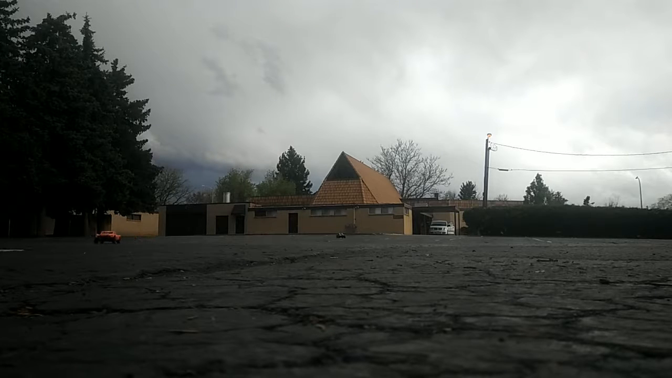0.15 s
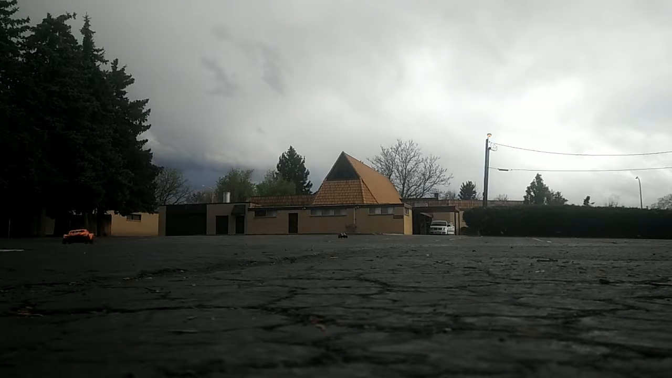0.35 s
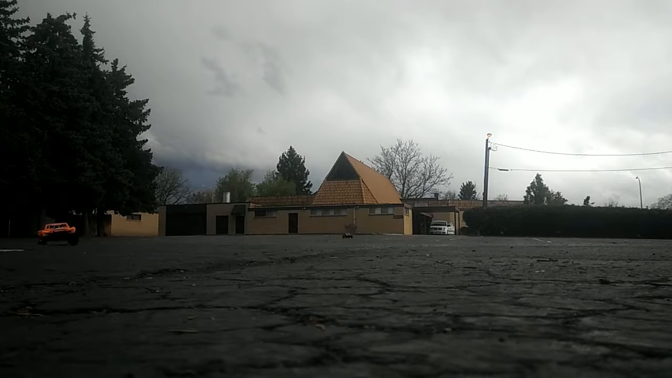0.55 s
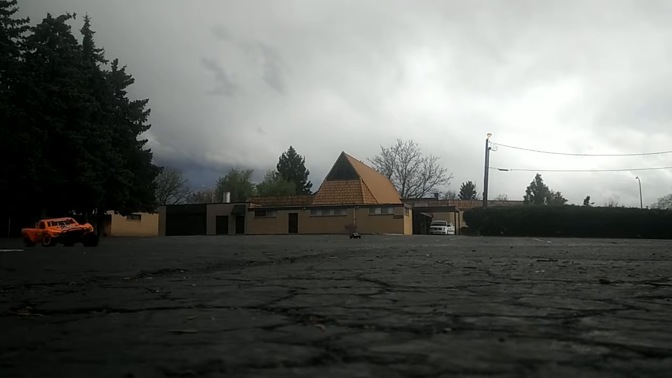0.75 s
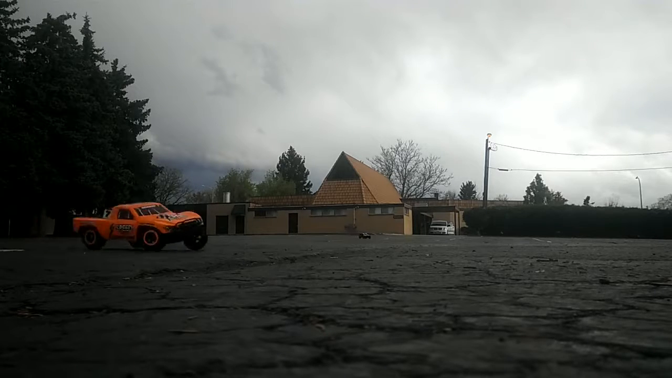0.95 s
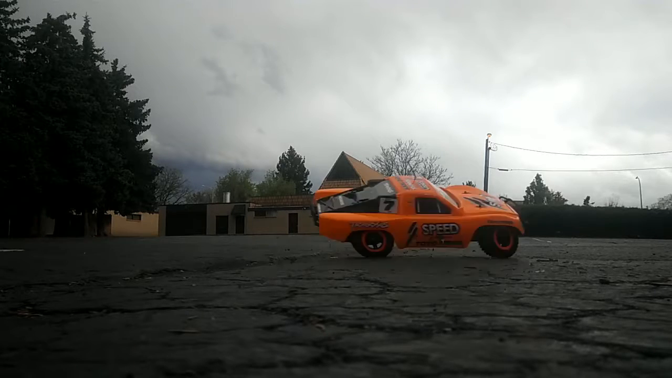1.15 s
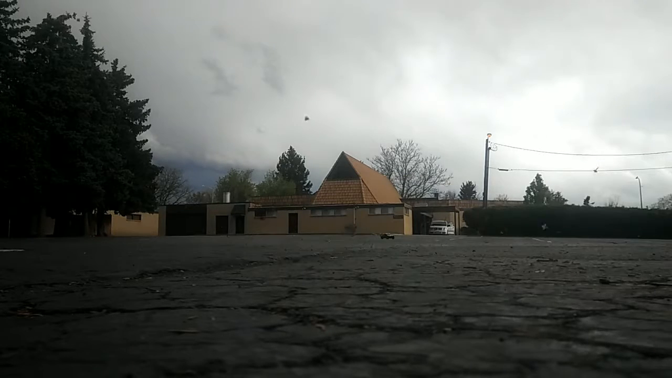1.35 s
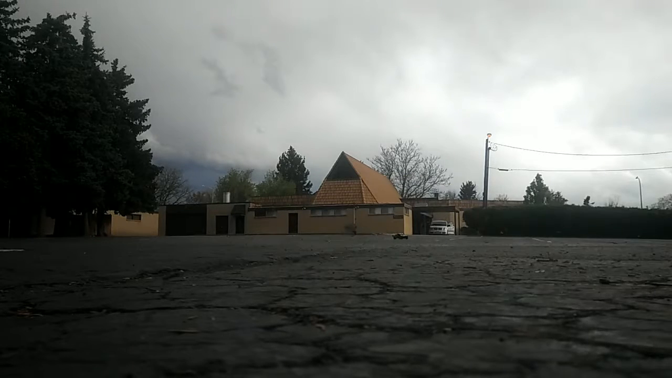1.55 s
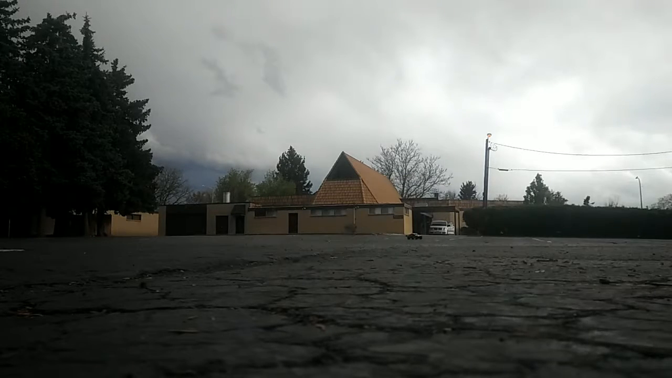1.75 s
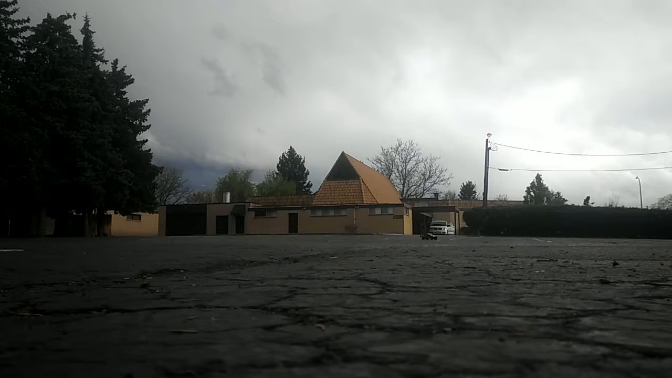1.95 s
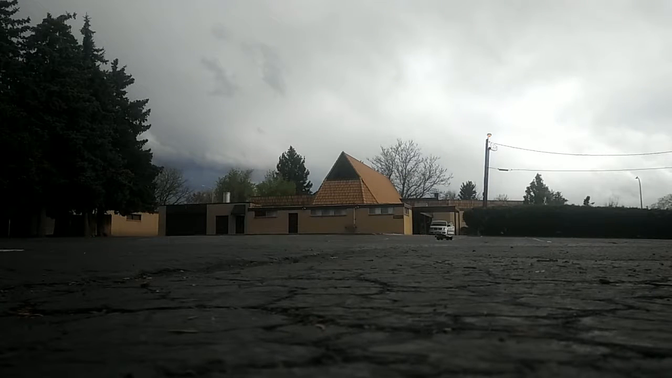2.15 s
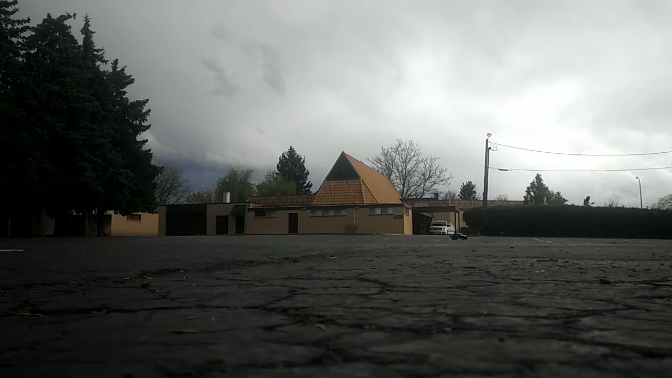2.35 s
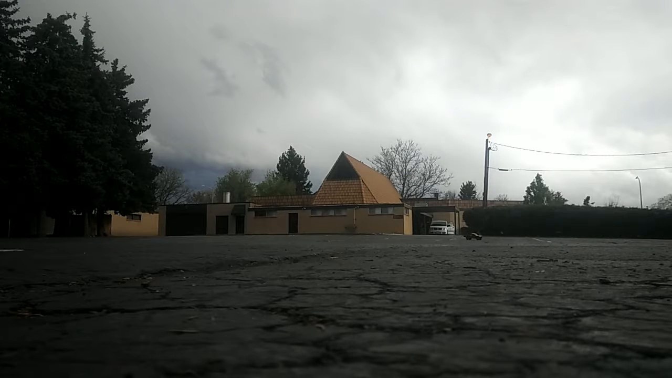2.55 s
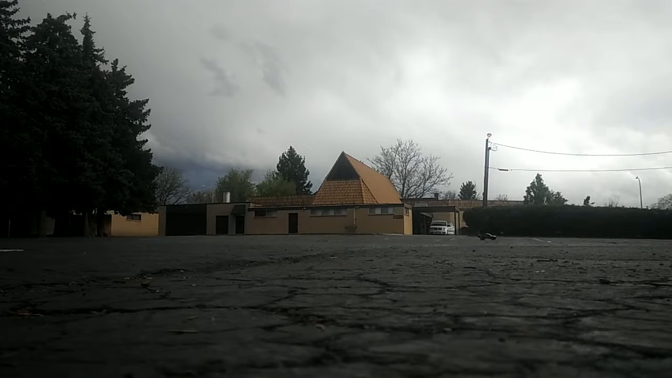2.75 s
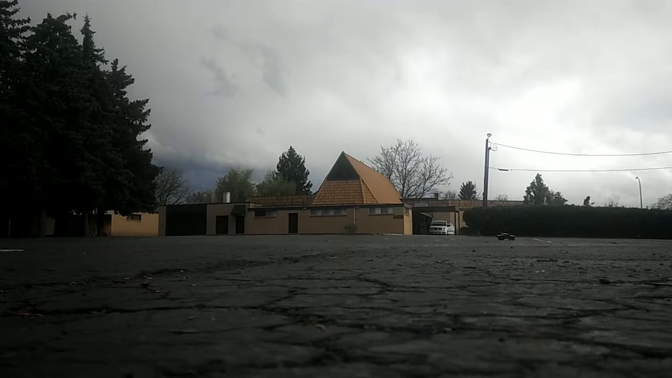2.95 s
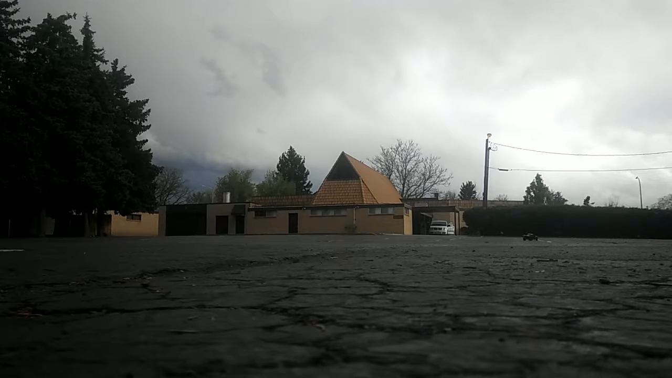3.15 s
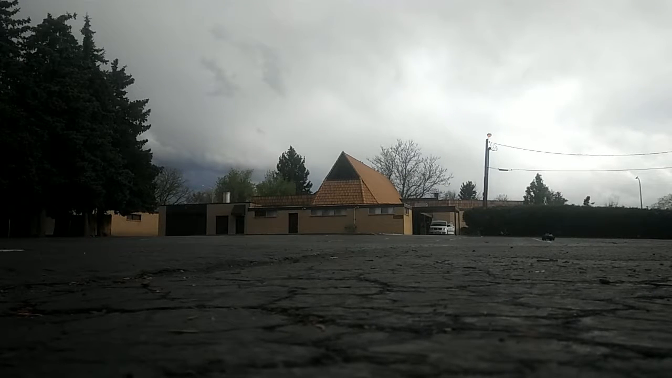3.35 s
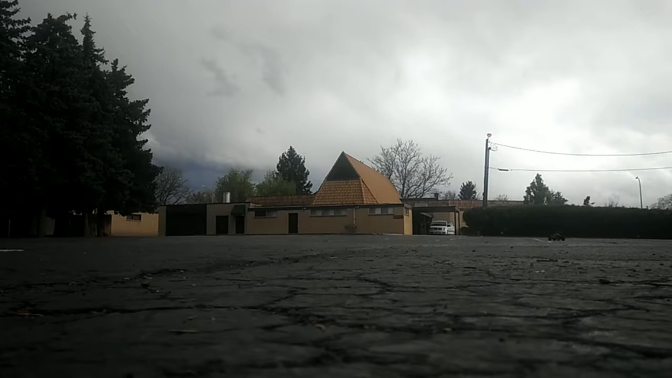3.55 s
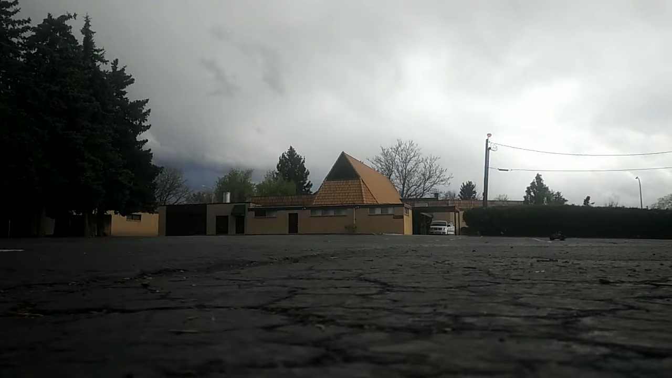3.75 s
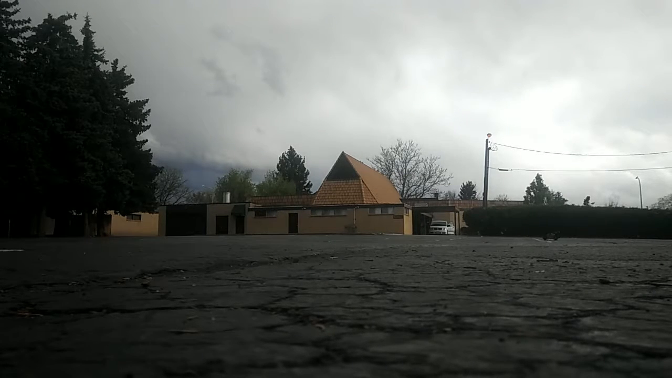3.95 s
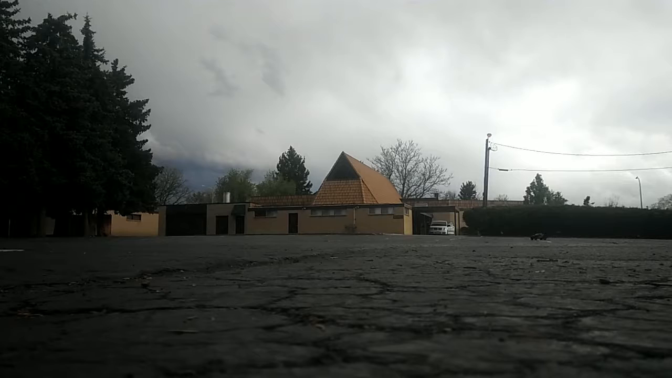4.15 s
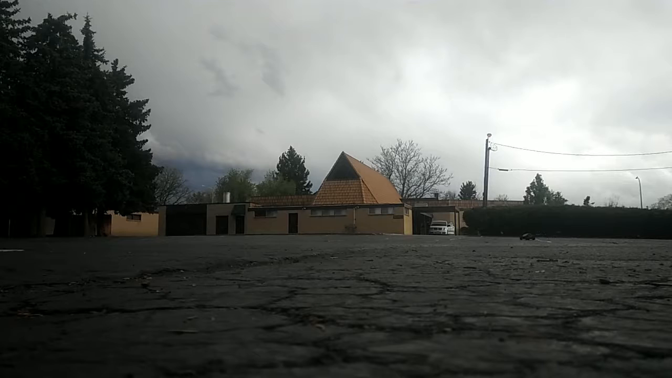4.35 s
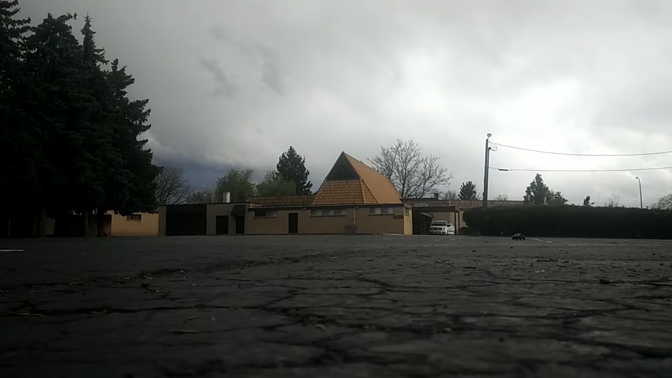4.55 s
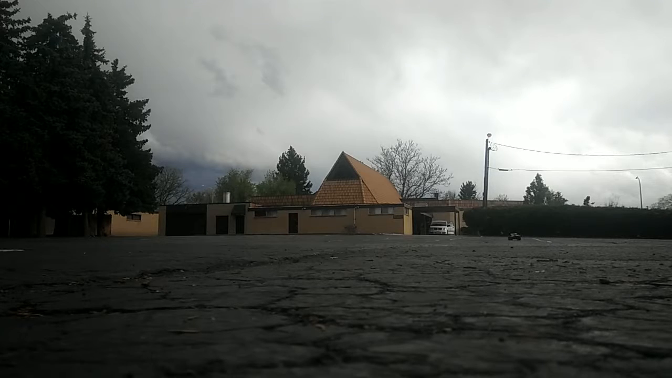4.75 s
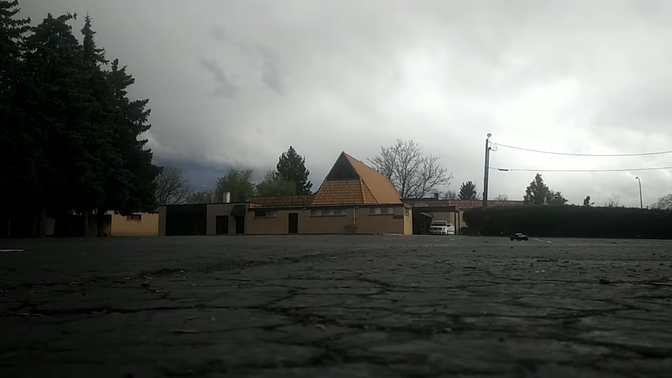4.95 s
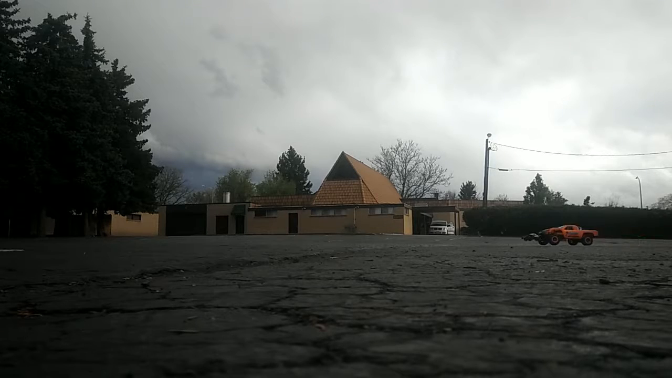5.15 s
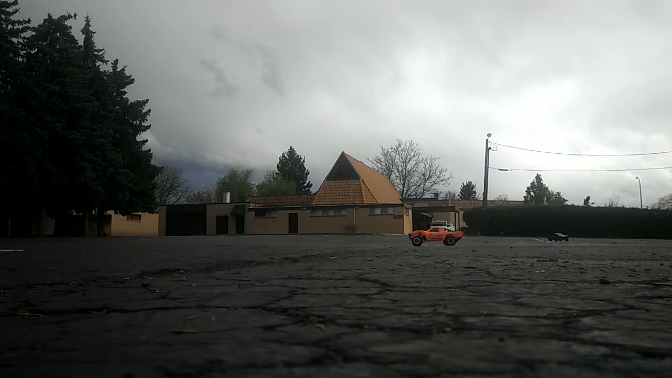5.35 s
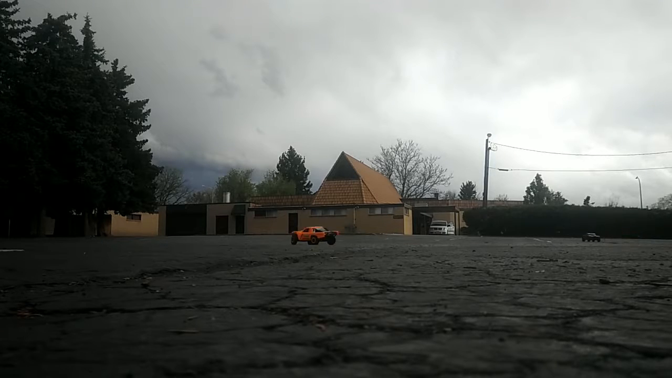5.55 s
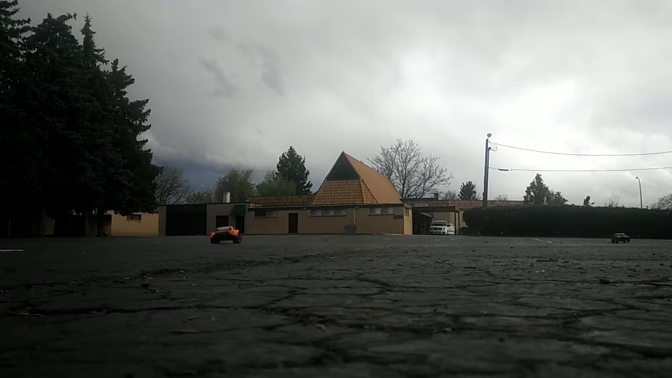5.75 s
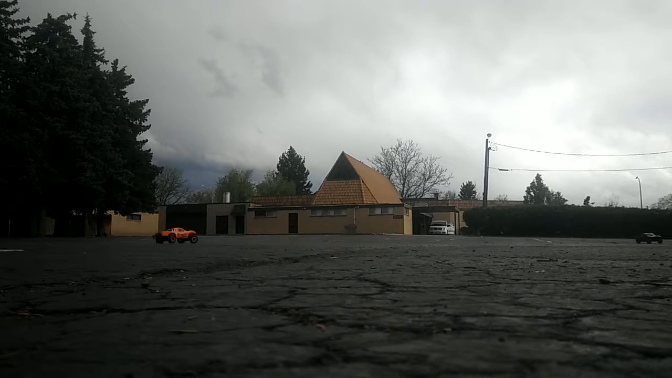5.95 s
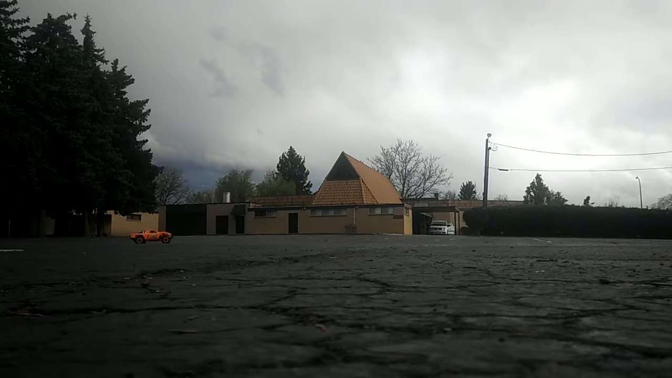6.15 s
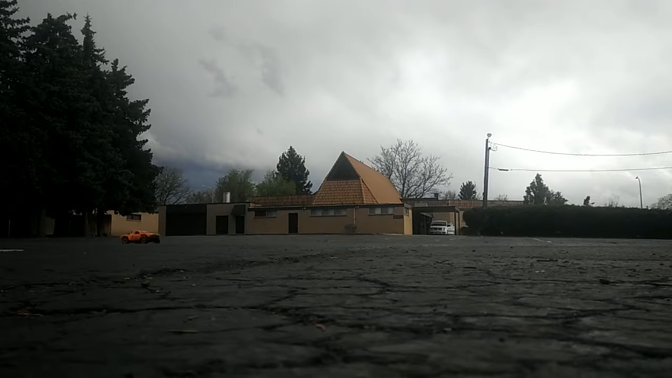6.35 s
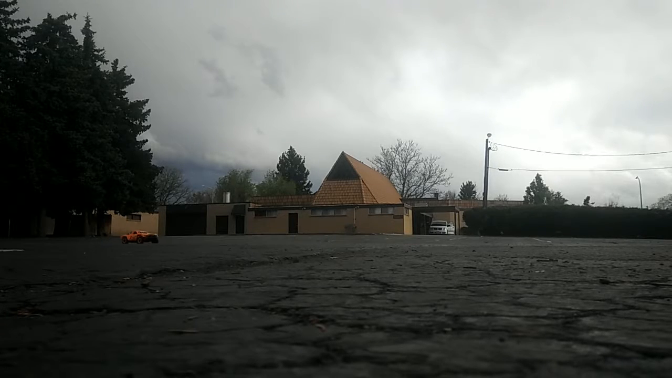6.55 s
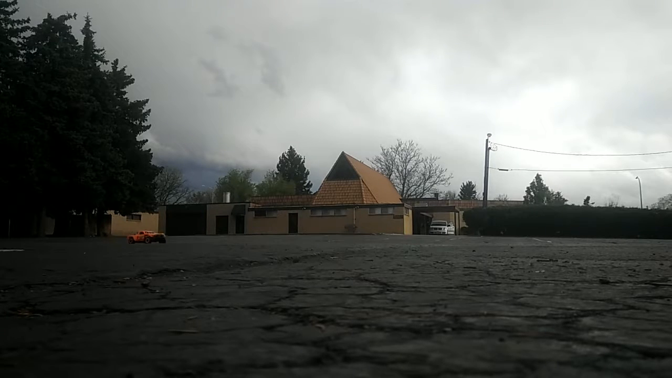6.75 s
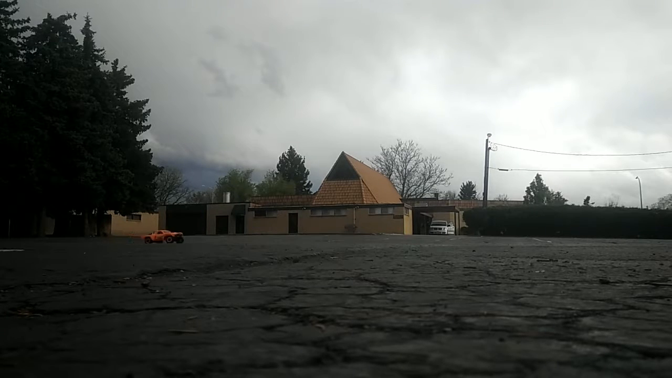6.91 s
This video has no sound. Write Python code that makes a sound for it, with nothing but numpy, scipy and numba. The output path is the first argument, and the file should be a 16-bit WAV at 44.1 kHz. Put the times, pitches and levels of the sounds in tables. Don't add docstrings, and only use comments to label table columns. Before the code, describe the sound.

Outdoors on rough asphalt, a phone on the ground catches gusty wind thumps and a small electric truck approaching with growing tyre hiss and howl. Its hollow plastic shell bangs, scrapes harshly and tumbles, then settles in light taps. After small squeaks and motor grunts, a gear whine climbs farther off with scrubbing knobby tyres, wavers, bumps, nearly stops and pulls away again.

```python
import sys
import numpy as np
from scipy import signal
from scipy.fft import rfft, irfft, next_fast_len
from scipy.io import wavfile
from scipy.ndimage import uniform_filter1d
from numba import njit

SR = 44100
rng = np.random.default_rng(int(sys.argv[2]) if len(sys.argv) > 2 else 0)


def voltage_ratio(decibels):
    exponent = np.asarray(decibels, float) / 20
    return 10 ** exponent


def master_out(mix):
    frames = np.transpose(np.atleast_2d(mix))
    ceiling = np.clip(frames, -1, 1)
    pcm = np.round(ceiling * 32767).astype(np.int16)
    wavfile.write(sys.argv[1], SR, pcm)


N = 307818
T, M = np.arange(N) / SR, next_fast_len(N)
LOG_HZ = np.log(np.maximum(np.arange(M // 2 + 1) * SR / M, 1))
TOP_HZ = 15800

# pitch_hz, level_db (per Hz)
AIR_COLOUR = [(15, -81), (25, -48), (85, -8.5), (166, -10), (281, -7), (430, -45.5), (500, -7), (650, -51),
              (1100, -120)]
# peak_s, peak_db, rise_s, fall_s, edge_db
GUSTS = [(.12, -41.5, 0.12, 0.38, -9), (.41, -41, 0.12, 0.51, -41), (.5, -50, 0.052, 0.1, -16),
         (.62, -41.5, 0.37, 1, -10), (.715, -35.5, 0.055, 0.16, 5), (1.2, -44, 0.15, 0.049, 0),
         (1.69, -35.5, 0.64, 0.19, 0), (2.3, -46, .04, 0.27, 0), (2.408, -33, 0.022, 0.022, 2),
         (2.43, -47, .06, 0.24, -16), (2.62, -52.5, .2, 0.22, -23), (5.02, -43, 0.22, 0.5, -19),
         (5.27, -63, .12, 0.29, -16), (6.036, -33, 0.025, 0.044, -4), (6.11, -47.5, 0.11, 0.26, -23),
         (6.66, -44.5, 0.23, 0.14, -29), (6.717, -31.5, 0.069, 0.21, 0.5), (6.77, -50, .05, 0.94, -10)]
# start_s, peak_db, pitch_hz
PUFFS = [(0.106, -38, 134), (0.186, -43, 161), (0.376, -31, 172), (0.436, -39, 125), (0.501, -23, 174),
         (0.542, -26, 127), (0.575, -38, 215), (0.61, -26, 140), (0.654, -23, 232), (0.714, -18, 237),
         (0.746, -30, 215), (4.969, -31, 124), (5.037, -30, 129), (6.708, -14, 184), (6.74, -28, 248)]
# start_s, quarter_mesh_hz, whine_db, lower_mesh_db (re whine)
LAUNCH = [
    (2.91, 762, -52, -10),
    (2.92, 767, -23.5, -15),
    (2.94, 767, -32, -14),
    (2.96, 990, -30, -16),
    (2.98, 1015, -31, -14),
    (3.05, 1186, -35, -9),
    (3.11, 1244, -35, -4),
    (3.17, 1330, -38.5, -8),
]
CRUISE = [(3.22, 1414, -40, -1), (3.32, 1501, -40, -11), (3.42, 1602, -38, -5), (3.58, 1562, -43.5, -6),
          (3.72, 1560, -40, -0.5), (3.9, 1482, -36.5, -10), (4.18, 1353, -40.5, 2), (4.4, 1336, -42.5, -1),
          (4.56, 1353, -41.5, -1), (4.75, 1416, -41.5, -0.5), (5.0, 1562, -41, -3.5), (5.14, 1599, -46, -2),
          (5.4, 1555, -41, -1.5), (5.58, 1508, -48, 6), (5.75, 1648, -48, -1), (6.0, 1610, -40, -5.5),
          (6.2, 1538, -45.5, -10), (6.4, 1517, -47, 0)]
RESTART = [(6.45, 1495, -46, -8), (6.49, 1420, -46, -8), (6.53, 1277, -48, -8), (6.575, 1040, -44, -12),
           (6.626, 650, -42, -12), (6.66, 470, -54, -12), (6.72, 300, -65, -12), (6.765, 325, -43, -12),
           (6.79, 500, -46, -12), (6.81, 670, -41, -12), (6.84, 850, -43, -12), (6.89, 1035, -43, -12),
           (6.98, 1200, -46, -8)]
# multiple, level_db, follows_lower_mesh (0-1), slack_db, flutter_depth, width_hz
MESH_ORDERS = [(2, 2.5, 1, -9, .015, 95.), (3, -6, 1, -4, .012, 120.), (4, -1, 0, -20, .025, 200.),
               (6, -17, 0, -12, .025, 250.), (8, -26, 0, -10, .025, 300.)]
# start_s, share
FLUTTER = [(3.3, .2), (3.9, .4), (4.1, .6), (4.3, 1.3), (4.7, 1.2), (5.1, 1.3), (6.1, 1.1), (6.3, .5),
           (6.45, .05)]
# centre_s, half_length_s
SKIPS = [
    (3.126, 0.016),
    (3.185, 0.0061),
    (5.593, 0.11),
    (6.508, .005),
    (6.547, .005),
    (6.923, .006),
]
# pitch_hz, width_hz, level_db
HOUSING = [(2720, 880, -2.5), (3960, 300, -0.5)]
# start_s, peak_db, pitch_hz
RATTLES = [(0.5681, -51, 7200), (0.7721, -48, 6460), (0.886, -33, 7140), (0.9951, -31.5, 6430),
           (1.083, -32.5, 7060), (1.171, -29.5, 6900), (1.2584, -18.5, 7080), (1.3406, -31, 7020),
           (1.4194, -35, 6650), (1.4486, -28, 6700), (1.4745, -41, 6560), (5.1394, -42, 6900),
           (5.239, -39, 6800), (5.29, -43, 7500), (5.3318, -41, 6520), (5.571, -36, 7100),
           (5.71, -43, 6520), (5.747, -36.5, 7000), (5.7867, -36, 6500), (5.835, -38, 6900),
           (5.898, -51, 6450)]
# start_s, length_s,
# from_hz, to_hz, level_db
SQUEAKS = [(1.466, 0.1, 5370, 5500, -33), (1.56, .045, 5450, 5500, -38), (1.985, .05, 12000, 8000, -41),
           (.91, .13, 3520, 3400, -47), (1.994, .016, 5800, 5300, -28), (2.102, .015, 3900, 4050, -28),
           (2.139, .011, 4200, 3800, -30), (2.466, .012, 9500, 8900, -46), (2.476, .012, 8500, 6000, -46),
           (2.482, .01, 4200, 4350, -47), (2.48, .011, 2400, 2150, -36), (2.53, 0.036, 9900, 9700, -49),
           (2.575, .03, 1400, 1700, -42), (2.6, .018, 1800, 2000, -40), (2.723, 0.063, 1250, 1600, -39),
           (2.831, 0.053, 1297, 1424, -40.5), (2.98, 0.068, 790, 817, -47.5), (4.614, 0.1, 404, 401, -56.5),
           (5.162, 0.17, 405, 417, -57.5), (5.395, 0.051, 823, 748, -35.5), (5.579, 0.021, 3000, 3000, -35),
           (5.572, .03, 340, 330, -39), (5.608, .03, 330, 320, -41), (5.67, .04, 390, 370, -46),
           (5.999, 0.029, 4420, 4550, -41), (6.07, 0.036, 4600, 4440, -41)]
GRUNTS = [
    (2.654, 0.12, 772, 735, -43.5),
    (2.812, 0.067, 781, 720, -43),
]
# start_s, mesh_hz, whine_db
NEARING = [(0, 3470, -63.5), (.3, 3430, -57.5), (.55, 3470, -53.5), (.8, 3610, -55), (.95, 3500, -45.5),
           (1.08, 3460, -41.5), (1.2, 3430, -43.5), (1.33, 3460, -43), (1.41, 3424, -26.5),
           (1.5, 3440, -39.5), (1.6, 3370, -39.5)]
# multiple, level_db, width_hz
NEAR_ORDERS = [(1, 1.5, 150.), (1.74, -1.5, 380.), (1.87, -4.5, 300.), (2.03, 2.5, 280.)]
# start_s, level_db
AXLE_HUM = [
    (0, -48),
    (.7, -42.5),
    (1.0, -47),
    (1.2, -58.5),
]
# start_s, upper_hump_hz, level_db, load_db (feeds the lower hump)
HOWL = [
    [(0.0, 1220, -43, 3), (0.334, 1375, -40.5, -9), (1.006, 1330, -38.5, -3), (1.202, 1296, -37.5, 10),
     (1.376, 1323, -21, -12), (1.6, 1345, -30.5, -31)],
    [(2.9, 1385, -44.5, -35), (3.1, 1250, -35, -9), (3.34, 1445, -47.5, 6), (3.68, 1578, -35, -8),
     (3.96, 1134, -49, 10.5), (4.5, 1363, -39, -1), (4.89, 1566, -37.5, -4), (5.39, 1610, -39, -1),
     (5.62, 1410, -43.5, 4), (5.8, 1264, -37, -4.5), (6.35, 1444, -40, 0.5), (6.66, 1335, -51, 3.5),
     (6.98, 1150, -42.5, 0.5)],
]
# start_s, level_db, wheelspin_db, load_db
TYRES = [
    [(0.0, -46.5, -35, 7.5), (.27, -45, -28.5, 2.5), (.56, -38, -32, -1), (.68, -38.5, -19, 0),
     (1.138, -28.5, -13.5, 1.5), (1.2, -31, -8, 5.5)],
    [(2.6, -38, -37, 3), (2.67, -40, -46, -0.5), (2.87, -45, -49, -0.5), (2.94, -36.5, -15.5, -6.5),
     (3.45, -35.5, -11, 0), (4.11, -36, -20.5, 0.5), (4.55, -40, -12.5, -1), (5.0, -35, -14.5, -3.5),
     (5.86, -36.5, -13.5, 0.5), (6.3, -35.5, -19, 0), (6.55, -38.5, -28.5, -1.5), (6.75, -42, -41, -0.5),
     (6.98, -35.5, -27, -2)],
]
# pitch_hz, level_db (per Hz)
TYRE_COLOUR = [(280, -18.5), (400, -1.5), (540, -3), (700, -3.5), (1050, 2), (1500, 4.5), (2300, -1.5),
               (4200, -4.5), (5200, -10.5), (6500, -7), (7600, -13.5), (9000, -23), (11000, -30),
               (13000, -28), (15500, -46)]
# peak_s, peak_db, rise_s, fall_s
CRACKS = [(.7, -48.5, 0.11, 1), (1.18, -34.5, 0.91, 0.076), (3.55, -50, 0.086, 0.085),
          (3.06, -61, 0.029, 0.081), (3.76, -67, 0.12, 0.24), (4.63, -55, 0.074, 0.21),
          (4.78, -62, 0.083, 0.35), (5.22, -53, 0.42, 0.47), (5.546, -35, 0.0094, 0.32),
          (6.26, -49, 0.58, 0.27), (6.729, -50, 0.18, 0.13)]
# start_s, peak_db
CHIPS = [
    (1.6298, 7.5),
    (1.635, 1.5),
    (1.657, -15),
    (1.7134, -17),
    (1.849, -9.5),
    (2.0734, -11),
    (2.254, -22),
    (2.3341, -32),
]
# start_s, drag_db, weight_db, rasp_db
DRAG = [
    [(1.14, -29, -14, 0.5), (1.228, -16.5, 4, 1), (1.47, -22.5, -9, 5.5), (1.566, -29, 2, 6)],
    [(1.66, -3.5, 5.5, -4.5), (1.774, -28.5, 10, 5.5), (1.81, -23, 8, 3.5), (1.87, -18.5, 7, -1.5),
     (1.955, -30, 1, 2.5), (2.01, -16, 4, -0.5), (2.07, -15.5, 12.5, 0.5), (2.135, -27.5, 8.5, 2),
     (2.165, -18.5, 12.5, -1), (2.2, -20.5, 8.5, -4), (2.27, -24.5, 5.5, -0.5), (2.384, -37.5, -3.5, -4.5),
     (2.66, -43.5, -59, -2.5)],
]
# pitch_hz, level_db (per Hz)
SHELL_COLOUR = [(59, -57), (100, -16.5), (181, -22.5), (300, -7), (348, -10), (468, 0), (643, -10),
                (1530, -3.5), (2820, -4.5), (6860, -9.5), (15600, -24)]
# pitch_hz, width_hz, level_db
SHELL_MODES = [(291.5, 100, -6.5), (485.5, 21, -2.5), (565, 320, 3), (906, 260, 3), (1050, 81, 0),
               (1514, 530, -2.5), (2370, 390, -6), (3890, 500, -10), (6100, 83, -26)]
# start_s, peak_db, crack_db (re peak), ring_t60_s
BLOWS = [
    (1.236, -1, -7, 0.016),
    (1.622, 5.5, -14, 0.24),
    (2.149, 6, -19.5, 0.11),
    (2.2133, -4.5, -13.5, 0.11),
]
BUMPS = [(1.197, 1.5, -10, 0.11), (1.206, 0, -11.5, 0.24), (1.258, 7.5, -15, 0.046), (1.272, -20, 5, 0.036),
         (1.304, -8, -12, 0.05), (1.342, -7, -1.5, 0.032), (1.382, -8.5, 0.5, 0.14),
         (1.406, -10.5, -2.5, 0.14), (1.447, -7.5, 9, 0.044), (1.472, -20, -18, 0.033),
         (1.547, -9, 7.5, 0.057), (1.597, -6, 4.5, 0.041), (1.654, 11, -13, 0.21), (1.711, -5, 0, 0.29),
         (1.753, -2.5, 8, 0.039), (1.823, -4, -8, 0.18), (1.847, -4.5, -4, 0.088), (1.868, -17, -15, 0.066),
         (1.995, -2.5, -21.5, 0.23), (2.037, -5.5, -12.5, 0.12), (2.047, -6, -16, 0.41),
         (2.083, -15.5, -1, 0.053), (2.188, -3.5, -10.5, 0.1), (2.253, -6.5, -11, 0.25),
         (2.283, -19, -18, 0.092), (2.334, -13, -10, 0.092), (5.535, -19.5, -14, 0.16),
         (5.576, -10.5, -7, 0.079)]
TAPS = [(2.355, -40, 0, 0.039), (2.39, -29, 2, .05), (2.42, -24.5, 1, 0.077), (2.443, -38, -2, 0.036),
        (2.482, -25, 1.5, 0.055), (2.523, -26, -0.5, 0.18), (2.563, -25, 2, 0.15), (2.588, -32, 7, 0.057),
        (2.598, -34, 1, 0.074), (2.612, -34, 3, 0.049), (2.665, -33, 1.5, 0.056)]
# start_s, notch_hz, depth (0-1)
BOUNCE = [(0, 710, 0.75), (.2, 706, 0.6), (.56, 690, 0.53), (.65, 734, 0.18), (2.499, 1020, 0.22),
          (2.699, 980, 0.7), (3.1, 1025, 0.02), (4.3, 880, 0.28), (4.55, 1007, 0.5), (4.8, 1010, 0.73),
          (5.0, 1117, 0.4), (5.12, 1080, 0.06), (5.25, 1017, 0.96), (5.45, 1050, 0.24), (5.55, 1050, 0)]
# pitch_hz, level_db
NOISE_GATE = [(150, -93.5), (300, -106), (420, -75.5), (560, -69.5), (750, -81), (1060, -65.5), (1400, -75),
              (3500, -90), (5400, -84), (6500, -91), (8200, -82), (10500, -99), (15000, -96)]


def level(x, db):
    return x * voltage_ratio(db) / np.sqrt(np.mean(x ** 2))


def noise():
    return rng.standard_normal(N)


def band(x, lo_hz, hi_hz, order=3):
    return signal.sosfilt(signal.butter(order, [lo_hz, hi_hz], "band", fs=SR, output="sos"), x)


def play(spans):
    rows = np.concatenate(spans)
    gate = 0
    for span in spans:
        start, end = span[0][0], span[-1][0]
        gate = gate + np.interp(T, [start - .02, start, end, end + .02], [0, 1, 1, 0])
    return [np.interp(T, rows[:, 0], column) for column in rows[:, 1:].T], gate


@njit
def svf(x, hz, width):
    y, b, l = np.empty(len(x)), 0., 0.
    for i in range(len(x)):
        g, k = np.tan(np.pi * hz[i] / SR), width / hz[i]
        v = (b + g * (x[i] - l)) / (1 + g * (g + k))
        b, l, y[i] = 2 * v - b, l + 2 * g * v, k * v
    return y


def rough_tone(hz, width_hz):
    return level(svf(svf(noise(), hz, width_hz), hz, width_hz), 0)


def walk(rate):
    k = int(SR / rate)
    held = np.repeat(rng.standard_normal(N // k + 1), k)
    return 0.76 * uniform_filter1d(uniform_filter1d(held, k), k)[:N]


def colour(points):
    hz, db = np.transpose(points)
    return voltage_ratio(np.interp(LOG_HZ, np.log(hz), db))


def swell(s, db, rise_s, fall_s):
    return voltage_ratio(db - 30 * np.maximum((s - T) / max(rise_s, .005), (T - s) / max(fall_s, .005)))


def friction(controls, points, low_hz, knee_hz, edge, grains, spread_db, bump_db, flicker_db):
    db, low, mid, top = controls
    size = np.minimum(rng.exponential(size=N), 4)
    stones = (rng.random(N) < grains / SR) * voltage_ratio(spread_db * size) * noise()
    rub = rfft(noise() + level(stones, -1.8), M) * colour(points)
    bumps = walk(40) + 2.54 * walk(110)
    treble = mid - 3.5 + 0.34 * np.minimum(top - mid + 15, 0)
    air = top - 23 + 1.27 * np.minimum(db + top + 51.0, 12)
    slices = [
        (low_hz, knee_hz, low, 1), (knee_hz, 1150, 0.059 * low - 3, .8), (1157, 2210.0, -1.5, 0.7),
        (2200, 4800, mid - 2.5, 1), (4800, 8000, treble, 1), (8000, 13000, top, 1.3), (13000, TOP_HZ, air, 1.6)]
    out = 0
    for lo, hi, rel_db, shake in slices:
        centres = np.linspace(np.log(lo), np.log(hi), 3)
        inside = np.minimum(LOG_HZ - np.log(lo), np.log(hi) - LOG_HZ)
        window = np.clip(.5 + inside / edge, 0, 1)
        part = 0
        for peak in np.eye(3):
            third = irfft(rub * window * np.interp(LOG_HZ, centres, peak), M)[:N]
            part = part + third * voltage_ratio(flicker_db * walk(15))
        out = out + level(part * voltage_ratio(bump_db * shake * bumps), 0) * voltage_ratio(db + rel_db)
    return out


def still_air():
    return level(irfft(rfft(rng.standard_normal(M)) * colour(AIR_COLOUR), M)[:N], -70)


def far_hiss():
    top = band(noise(), 7800, 11200) * voltage_ratio(5 * walk(30))
    main = band(noise(), 5900, 7370) * voltage_ratio(3 * walk(25))
    return level(main, -69.5) + level(top, -81)


def wind():
    eddies = voltage_ratio(2.6 * walk(45))
    low = level(band(noise(), 79.4, 193) * eddies, 0.27)
    high = level(band(noise(), 206, 330) * eddies ** 2.5, -2.5)
    return sum(swell(*row) * (low + voltage_ratio(min(edge_db, 0)) * high) for *row, edge_db in GUSTS)


def puffs():
    out = np.zeros(N)
    for s, db, hz in PUFFS:
        n = int(2.5 / hz * SR)
        out[int(s * SR):][:n] += voltage_ratio(db - 1) * np.hanning(n) * np.sin(2 * np.pi * hz * T[:n])
    return out


def gears():
    (hz, db, lower_db), gate = play([LAUNCH + CRUISE + RESTART])
    start, step_s, steps_end_s = LAUNCH[0][0], .04, 3.23
    stepped = start + (np.maximum(T - start, 0) // step_s + .5) * step_s
    hz = uniform_filter1d(np.interp(np.where(T < steps_end_s, stepped, T), T, hz), size=120)
    turn = np.sin(2 * np.pi * (0.31 + np.cumsum(hz / 62 * (1 + .12 * walk(12))) / SR))
    waver = (.75 * turn + .45 * walk(70)) * np.interp(T, *np.transpose(FLUTTER))
    slack = sum(np.clip(1.5 - np.abs(T - s) / half, 0, 1) for s, half in SKIPS)
    hiss = (8.1, -15 + 17 * np.log2(hz / 1500), 0.0069, -13.5, 0.01, 1900.0)
    out = 0
    for order, rel_db, lower, slack_db, depth, width_hz in MESH_ORDERS + [hiss]:
        centre = order * hz * (1 + depth * waver + 0.005 * walk(66))
        boost = sum(g / (1 + (2 * (centre - f) / w) ** 2) for f, w, g in HOUSING)
        boost = boost + 8 * (order == 8) * (T < steps_end_s)
        unsteady_db = slack_db * slack + 1.44 * walk(45) + 4.5 * waver
        gain_db = db + rel_db + lower * lower_db + boost + unsteady_db
        out = out + rough_tone(centre, width_hz) * voltage_ratio(gain_db)
    return out * gate


def rattles():
    s, db, hz = np.transpose(RATTLES)
    jolt = np.zeros(N)
    jolt[(s * SR).astype(int)] = voltage_ratio(db + 5.0)
    buzz = rough_tone(np.interp(T, s, hz), 860.0)
    sizzle = level(band(noise(), 7200, 14500), -19.5)
    return signal.fftconvolve(jolt, np.hanning(900))[:N] * (buzz + sizzle)


def squeaks(table, over_db):
    out, drift = np.zeros(N), 1 + .007 * walk(300)
    for s, length, from_hz, to_hz, db in table:
        n = int(length * SR)
        hz = np.linspace(from_hz, to_hz, n) * drift[int(s * SR):][:n]
        phase = 2 * np.pi * np.cumsum(hz) / SR
        tone = np.sin(phase)
        for k in range(2, 7 if 600 < to_hz < 1000 else 3):
            tone = tone + voltage_ratio(over_db - 11.5 * np.log2(k / 2)) * np.sin(k * phase)
        out[int(s * SR):][:n] += voltage_ratio(db + 6) * np.hanning(n) ** .4 * tone
    return out * voltage_ratio(2.5 * walk(90)) * (1 + 0.4 * walk(500))


def nearing_gears():
    (hz, db), gate = play([NEARING])
    throb = np.sin(2 * np.pi * np.cumsum(14 * (1 + 0.2 * walk(9.43))) / SR)

    def rough(k, width_hz):
        return rough_tone(k * hz, width_hz) * voltage_ratio(3 * walk(28))

    hum = voltage_ratio(np.interp(T, *np.transpose(AXLE_HUM))) * rough(0.481, 260.)
    mesh = sum(voltage_ratio(rel_db) * rough(k, width_hz) for k, rel_db, width_hz in NEAR_ORDERS)
    return gate * (hum + voltage_ratio(db + 4.5 * throb) * mesh)


def howl():
    (high_hz, high_db, load), gate = play(HOWL)
    low_hz = 752 + 0.3 * (high_hz - 1400)
    low = rough_tone(low_hz, 150.0) * voltage_ratio(high_db + load + 3.4 * walk(30))
    high = rough_tone(high_hz, 250.0) * voltage_ratio(high_db + 2.1 * walk(40))
    return gate * band(low + high, 660, 3660, order=4)


def tyres():
    (db, spin, load), gate = play(TYRES)
    thud = 20 * np.log10(voltage_ratio(db - 30) + sum(swell(*row) for row in CRACKS))
    controls = db + load, thud - db - load, -load, spin - load
    return gate * friction(controls, TYRE_COLOUR, 300, 613, edge=.1, grains=4000,
                           spread_db=1.5, bump_db=0.8, flicker_db=2.5)


def chips():
    s, db = np.transpose(CHIPS)
    hits = np.zeros(N)
    hits[(s * SR).astype(int)] = voltage_ratio(db - 4.5)
    tail = voltage_ratio(-60 * T[:2000] / 0.007)
    return signal.fftconvolve(hits, tail)[:N] * level(band(noise(), 3500, 13200), 0)


def dragging():
    (db, weight, rasp), gate = play([DRAG[0] + DRAG[1]])
    controls = db, weight, rasp, -15.5 + 2.26 * rasp
    return gate * friction(controls, SHELL_COLOUR, 93, 780, edge=.5, grains=3800,
                           spread_db=5.0, bump_db=0.9, flicker_db=5.5)


def knocks(table, rise_s, lift):
    body, crack, contact, age = np.zeros(N), np.zeros(N), np.ones(N), T[:8000]
    for s, db, crack_db, t60 in table:
        i = int(s * SR)
        hit = np.minimum(age / rise_s, 1) * voltage_ratio(db)
        body[i:][:len(age)] += hit * voltage_ratio(.5 * min(db + 8.0, 0) - 60 * age / max(t60, .01))
        crack[i:][:len(age)] += hit * voltage_ratio(crack_db - 60 * age / (0.7 * t60))
        contact *= np.interp(T - s, [-.04, -.012, 0, rise_s], [1, 1 - lift, 1 - lift, 1])
    return body, crack, contact


def kicks():
    out = np.zeros(N)
    for s, db, *_ in BLOWS:
        out[int(s * SR):][:30] += voltage_ratio(db + 4) * np.hanning(30)
    return out


def shell(body, crack, kick):
    push = body * noise() + kick
    ring = 0
    for k, (hz, width, db) in enumerate(SHELL_MODES):
        ring = ring + (-1) ** k * voltage_ratio(db) / np.sqrt(width) * svf(push, hz + 0 * T, 1. * width)
    return voltage_ratio(25) * band(ring, 154, 12000, order=2) + band(crack * noise(), 1000, 7400, order=4)


def tumbling_shell():
    blows = knocks(BLOWS, rise_s=0.00025, lift=0.72)
    bumps = knocks(BUMPS, rise_s=.007, lift=.4)
    taps = knocks(TAPS, rise_s=0.0019, lift=.15)
    body, crack = blows[0] + bumps[0] + taps[0], blows[1] + bumps[1] + taps[1]
    contact = blows[2] * bumps[2] * taps[2]
    return voltage_ratio(-2.5) * dragging() * contact + shell(body, crack, kicks())


def ground_bounce(x):
    s, notch_hz, depth = np.transpose(BOUNCE)
    for _ in range(2):
        x = x - np.clip(np.interp(T, s, depth), 0, 1) * svf(x, np.interp(T, s, notch_hz), 260.0)
    return x


def wall_echo(x):
    return voltage_ratio(-28.0) * np.concatenate([np.zeros(3100), band(x, 700, 4000)])[:N]


def gate_hiss(x):
    hz, _, z = signal.stft(x, SR, nperseg=1024)
    power = uniform_filter1d(uniform_filter1d(np.abs(z) ** 2, size=5, axis=-2), size=3, axis=-1)
    at_hz, db = np.transpose(NOISE_GATE)
    limit = voltage_ratio(np.interp(np.log(hz + 1), np.log(at_hz), db))[:, None] ** 2
    gain = np.clip(power / limit - 1, 0.41, 1)
    return signal.istft(z * gain, SR, nperseg=1024)[1][:, :N]


def scene():
    background = still_air() + far_hiss() + wind() + puffs()
    far = band(gears() + rattles(), 300, 12800, order=4)
    voices = squeaks(SQUEAKS, over_db=-22) + squeaks(GRUNTS, over_db=-3) + nearing_gears()
    rolling = howl() + voltage_ratio(-0.5) * tyres()
    trucks = ground_bounce(far + voices + rolling + chips() + tumbling_shell())
    return (background + trucks + wall_echo(trucks))[None]


def roll_off(x):
    return signal.sosfilt(signal.butter(12, 15790, fs=SR, output="sos"), x)


def record(dry):
    x = signal.sosfilt(signal.ellip(10, .2, 80, TOP_HZ, fs=SR, output="sos"), gate_hiss(dry))
    x = signal.sosfilt(signal.butter(2, 45, "high", fs=SR, output="sos"), x)
    x = .8 * np.tanh(np.abs(x / .8) ** 2) ** .5 * np.sign(x)
    return roll_off(x)


dry = scene()
out = record(dry)
master_out(out)
```